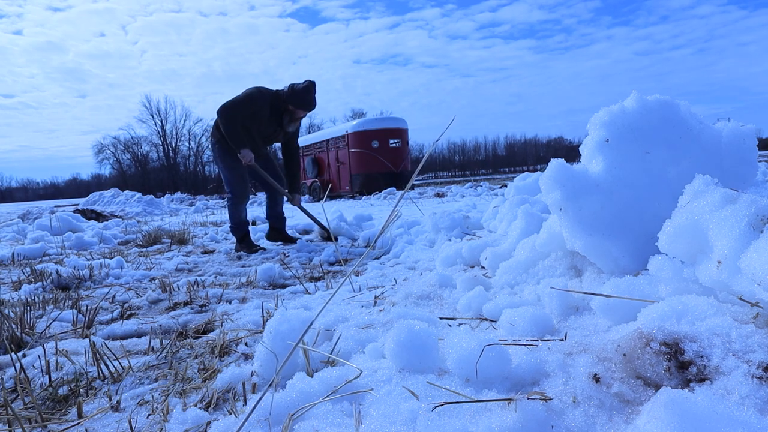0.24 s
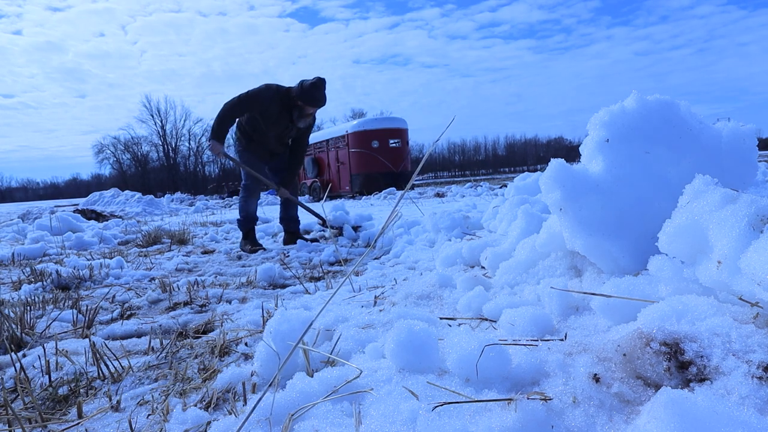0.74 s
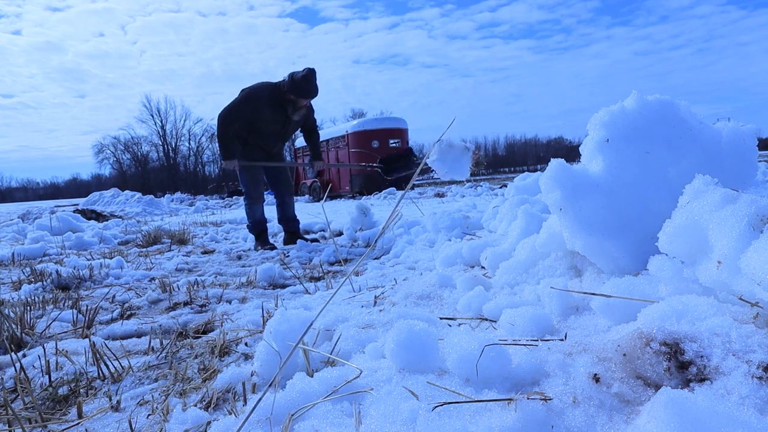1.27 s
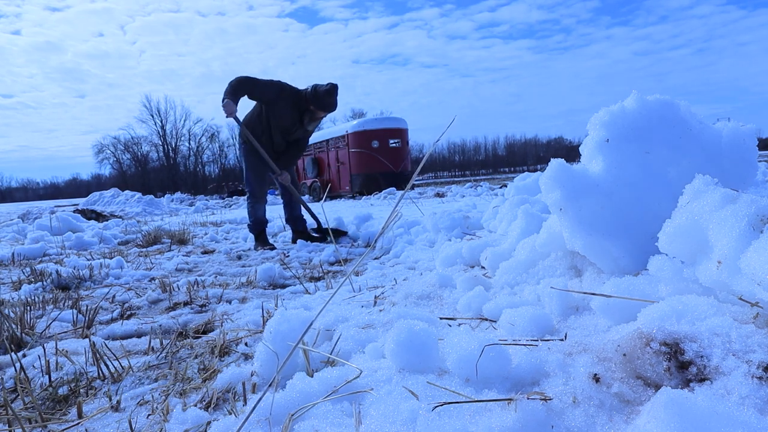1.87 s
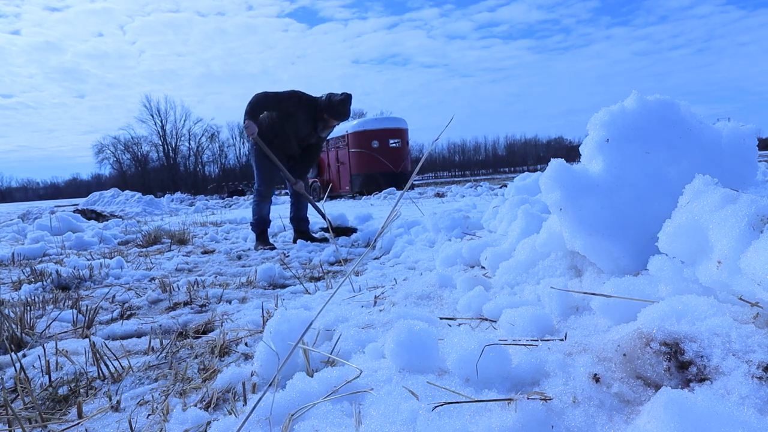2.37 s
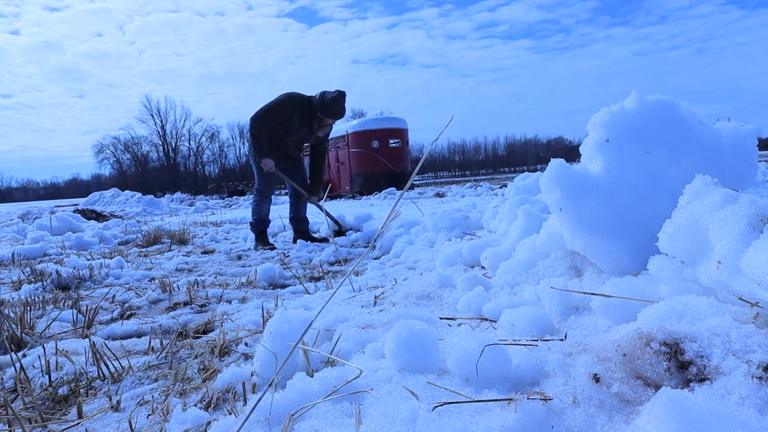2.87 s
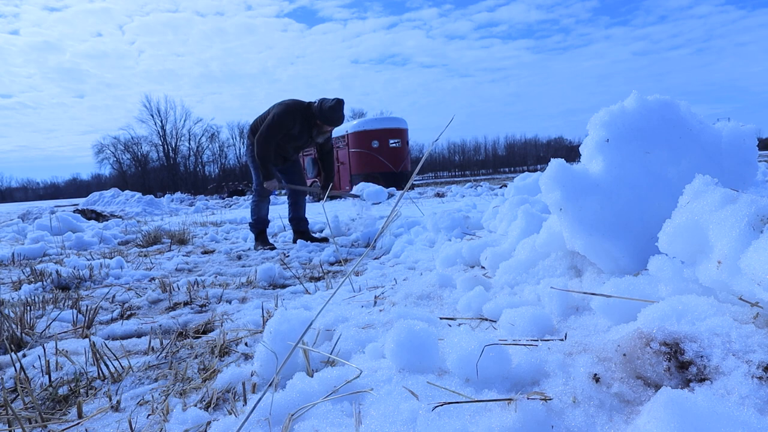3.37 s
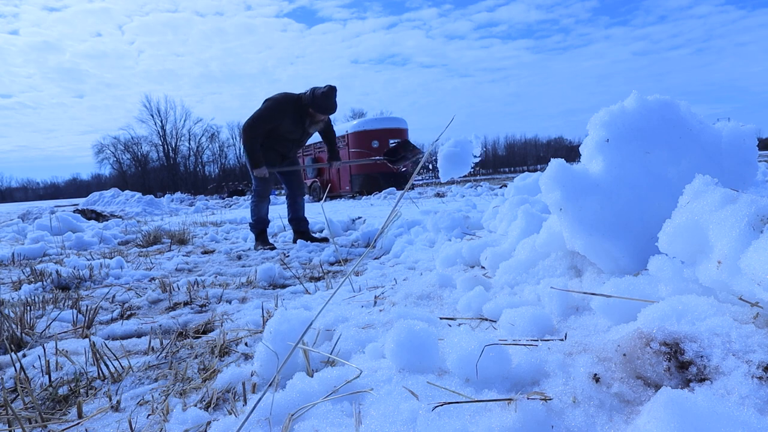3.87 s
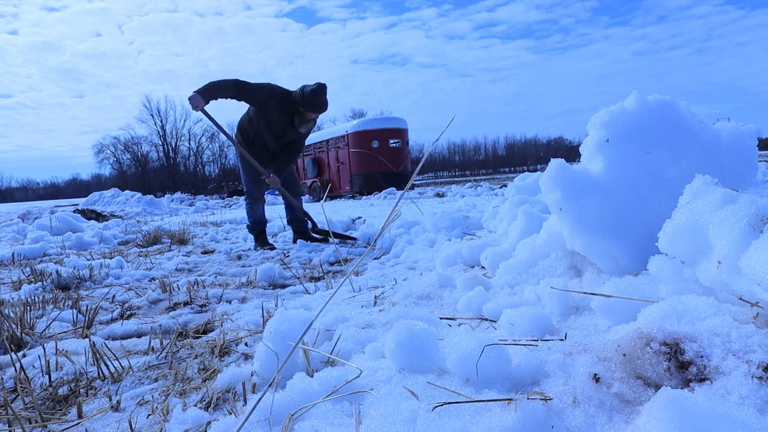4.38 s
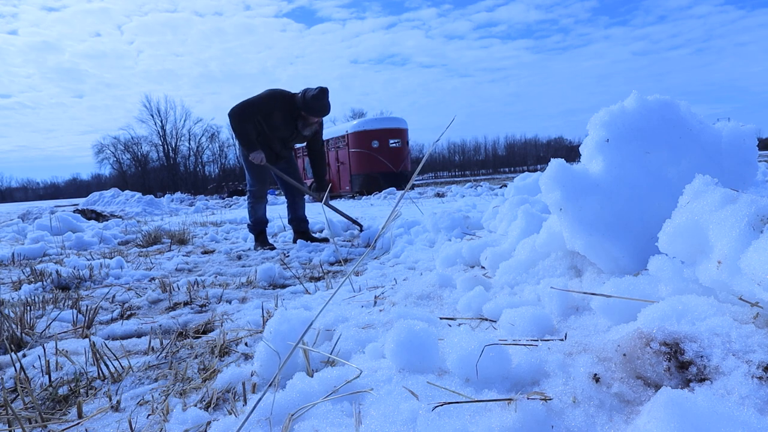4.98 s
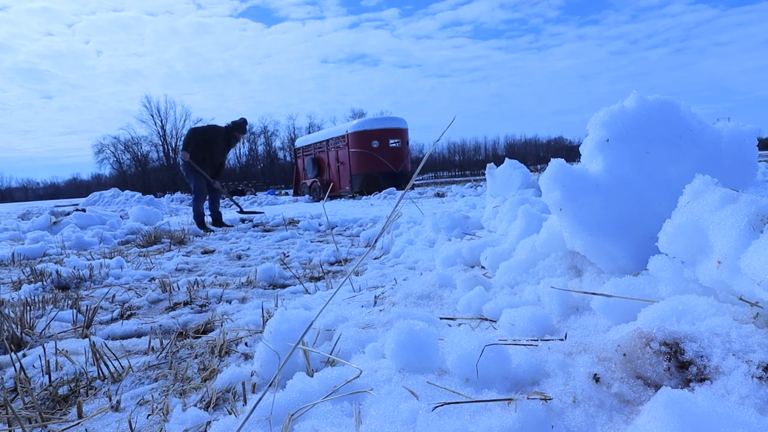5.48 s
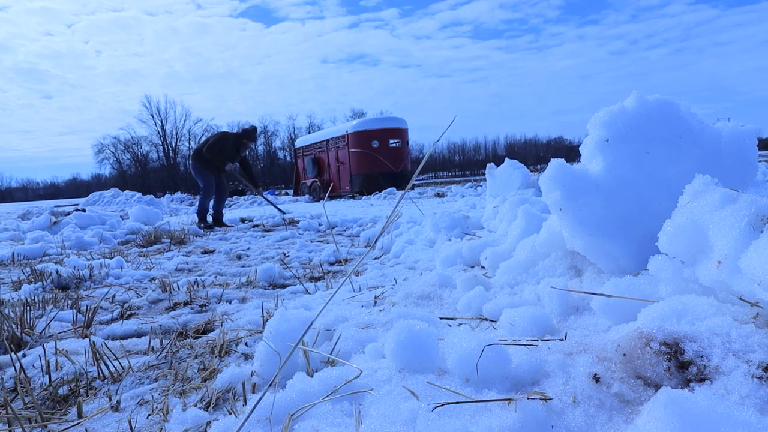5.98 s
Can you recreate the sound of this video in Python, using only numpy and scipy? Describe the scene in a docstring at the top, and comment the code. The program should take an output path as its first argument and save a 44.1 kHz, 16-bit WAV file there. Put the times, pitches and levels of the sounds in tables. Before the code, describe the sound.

Someone digs crusted snow with a long-handled metal shovel, fairly close to an outdoor microphone. A grating first push and a toss lead to sharp double chops, more crunching thrusts, another toss with falling clods, then ice-striking scrapes and a quieter final series. Low wind flutters throughout and a faint thin tone wavers late. Right-sided sound, faint hiss at left, no reverberation.

```python
"""A long-handled shovel digs in crusted snow: dense grains of breaking crust over a low crunch of packing.
The blade's modes ring short while buried and freely as a load slides off; its edge cracks ice and rasps.
Clods puff as filtered grains, wind rumbles and flutters as shaped noise, and a faint thin tone wavers.
All this sits on the right; the left is hiss with a trace of the right, 50 dB down."""
import sys
import numpy as np
from scipy import signal
from scipy.fft import rfft, irfft
from scipy.io import wavfile
from scipy.ndimage import uniform_filter1d

SR = 44100
rng = np.random.default_rng(int(sys.argv[2]) if len(sys.argv) > 2 else 0)


def pcm_store(signal):
    """Save signal as 16-bit PCM."""
    levels = np.round(np.clip(np.atleast_2d(signal), -1, 1) * 32767)
    wavfile.write(sys.argv[1], SR, levels.astype(np.int16).T)


N = 274875
TIME = np.arange(N) / SR

# All table levels are mix settings, ahead of layer trims, random swings and the output gain.
# Background spectra: [f/Hz, level/dB]; each is scaled to rms 1 before its layer level
HISS_SPECTRUM = [(30, -1), (100, -4), (300, -6), (1000, -9.5), (3000, -13), (8000, -15.5), (15500, -17.5)]  # idle left input
AIR_SPECTRUM = [(20, 1.5), (60, 2.5), (100, -10), (180, -15.5), (450, -24), (1100, -28.5), (2600, -34),
                (4200, -33), (9000, -37.5), (15500, -36.5)]  # steady air of the field
RUMBLE_SPECTRUM = [(12, -1.5), (27, 3), (48, -1.5), (75, -3), (110, -12), (200, -68)]  # large eddies
EDDY_SPECTRUM = [(45, -29), (90, 3), (135, -1), (200, -13), (320, -20), (700, -45)]  # small eddies
HISS_DB, AIR_DB = -56, -42.5
# Wind at the microphone: [t/s, rumble level/dB, small-eddy level/dB]
GUSTS = [(0.0, -41, -62), (0.05, -43, -57), (0.42, -33, -40), (0.47, -48, -46), (0.61, -31, -42.5),
         (0.8, -35, -40), (0.87, -40, -48.5), (1.02, -27.5, -40), (1.13, -38.5, -51), (1.68, -43, -48.5),
         (1.82, -33.5, -45), (2.34, -41.5, -43.5), (2.38, -33.5, -38), (2.48, -36, -38), (2.71, -42.5, -47),
         (2.85, -38, -38.5), (2.93, -40, -59), (3.42, -48, -54), (3.99, -35.5, -40), (4.84, -39.5, -47.5),
         (5.03, -54, -61), (5.14, -38.5, -55), (5.21, -58, -53.5), (5.24, -35.5, -38), (5.4, -42.5, -46),
         (5.5, -32.5, -38), (5.53, -43.5, -53), (5.99, -40, -49), (6.11, -43, -62), (6.23, -35, -41.5)]
BUFFET_PER_S, BUFFET_DB = 14, 2.5  # rate and rms depth of the quick swings of the rumble
# Faint thin tone far off: [t/s, f/Hz, level/dB]
FAR_TONE = [(4.95, 1044, -85), (5.02, 1075, -66), (5.1, 1110, -65), (5.12, 1232, -59), (5.25, 1230, -72),
            (5.36, 1240, -57), (5.43, 1230, -77)]
# Lumps of snow break, land or give way under a boot: [t/s, level/dB, nominal band f/Hz, t60/s]
CLODS = [(0.195, -45, 714, 0.07), (0.519, -38.5, 494, 0.054), (0.984, -39, 8000, 0.04),
         (2.042, -30, 710, 0.13), (2.527, -36, 6040, 0.033), (2.658, -27.5, 660, 0.097),
         (3.007, -41.5, 563, 0.047), (3.076, -42.5, 804, 0.13), (3.242, -40, 3000, 0.049),
         (3.61, -40, 7050, 0.071), (3.75, -30.5, 1880, 0.06), (3.821, -34, 1690, 0.062),
         (3.881, -40.5, 3000, 0.1), (3.94, -36.5, 6300, 0.11), (4.055, -35, 8300, 0.018),
         (4.09, -45, 10000, 0.11), (4.139, -30, 770, 0.13), (4.529, -34, 895, 0.058),
         (4.583, -31.5, 130, 0.09), (4.738, -27.5, 885, 0.083), (5.351, -44, 560, 0.069),
         (5.434, -37.5, 573, 0.092)]
# The blade chatters over frozen ground: [start t/s, end t/s, f/Hz, width/Hz, level/dB]
RASPS = [(0.108, 0.296, 750, 160, -38), (0.067, 0.255, 1520, 300, -34.5), (1.788, 1.975, 2180, 380, -37.5),
         (1.95, 2.1, 1485, 200, -35.5), (2.19, 2.225, 1490, 220, -42), (2.57, 2.705, 1300, 150, -37.5),
         (2.584, 2.752, 714, 90, -45), (3.72, 3.84, 826, 160, -47.5), (3.73, 3.848, 2017, 400, -41),
         (4.593, 4.908, 1575, 200, -42), (4.717, 4.86, 490, 90, -49), (4.69, 4.908, 1060, 60, -54),
         (4.795, 4.875, 3300, 200, -38), (5.723, 5.8, 511, 60, -53), (5.875, 5.968, 2700, 550, -35)]
# The edge strikes ice: [t/s, crack level/dB, crack t60/s, ping f/Hz, ping level re crack/dB]
CHOPS = [(1.792, -28, 0.14, 5826, -7.5), (1.955, -23.5, 0.045, 3870, -9), (1.975, -19.5, 0.022, 6450, -0.5),
         (2.572, -19, 0.15, 3700, -7.5), (2.596, -19.5, 0.034, 4360, -22), (3.285, -29, 0.05, 2490, -4.5),
         (4.489, -21, 0.019, 7330, -10.5), (4.806, -29.5, 0.11, 3336, 4.5), (5.686, -35, 0.06, 5010, -3),
         (5.814, -26, 0.051, 8690, -7.5), (5.896, -30.5, 0.053, 3020, 0.5)]
# Modes of the blade: [f/Hz, level/dB before decay weighting, free t60/s]
BLADE_MODES = [(728, -4, .3), (800, -5, .3), (865, -6, .28), (1044, -1, .55), (1250, -11, .25),
               (1410, -5, .25), (1446, -3, .45), (1572, 0, .4), (1645, -5, .25), (1893, -3, .4),
               (2028, -2, .3), (2191, -8, .2), (2395, -8, .17), (2640, -11, .15), (3310, -7, .15),
               (3750, -5, .17), (3925, -4, .15), (4445, -4, .15), (4915, -5, .2), (5800, -8, .12),
               (6395, -3, .15), (7675, -5, .1), (8390, -7, .08), (9225, -6, .08)]
# Colour of each snow layer: [f/Hz, level/dB]
CRUST_SPECTRUM = [(500, -15.5), (1300, -10.5), (2600, -5), (4200, 2.5), (6000, -1.5), (9200, -4.5),
                  (10400, -20), (16000, -24)]
PACKING_SPECTRUM = [(120, -14), (250, -6.5), (480, -1), (750, -0.5), (1050, -1), (1350, -5.5), (2000, -25),
                    (3000, -42)]
RUBBING_SPECTRUM = [(600, -43), (1000, -8), (1250, -5), (1530, -2.5), (2200, -1.5), (3000, -7), (6000, -15)]
POWDER_SPECTRUM = [(4000, -10.5), (8000, 1), (9500, 1.5), (11000, -3), (13000, -4), (16000, -9)]
SLIDING_SPECTRUM = [(400, -30), (720, -7.5), (1050, -2), (2100, -2), (3000, 1.5), (4500, -4), (8000, -22)]
# The blade is pushed into the snow: [start t/s, turning point t/s, end t/s, crust level there/dB,
# drop towards the start/dB, drop towards the end/dB (negative = louder),
# then re crust: rubbing level/dB, packing level/dB, powder level/dB]; "there" is the turning point
STROKES = [ (0.005, 0.139, 0.31, -29.5, 14.5, 15, -2.5, -9.5, -6),
           (1.793, 1.944, 1.99, -31.5, 5.5, -5.5, -8, -22.5, -9),
           (1.97, 1.972, 2.133, -27, 1, 11, -5, -7, -5),
           (2.568, 2.59, 2.76, -29.5, 11, 7.5, -6.5, -9.5, -4),
           (3.236, 3.302, 3.413, -33, 6.5, 4.5, -9, -13.5, -9),
           (3.366, 3.373, 3.775, -36, 3, 54, -1.5, -15, -14),
           (4.118, 4.145, 4.25, -38.5, 20, 14.5, -3.5, -8.5, -7.5),
           (4.457, 4.535, 4.575, -35.5, 2.5, 10, -8, -7.5, -6),
           (4.562, 4.764, 4.785, -32, 10.5, 1, -6, -10, -5),
           (4.789, 4.818, 4.943, -28, 3, 15, -3.5, -10.5, -10.5),
           (5.689, 5.698, 5.8, -42, 0, 1.5, -6, -19, -10), (5.802, 5.822, 5.885, -34, 5, 5, -4, -6.5, -4),
           (5.878, 5.9, 5.975, -33.5, 5, 9, 0.5, -3, -3), (5.975, 6.023, 6.095, -40, -1, 12, 3, 0.5, -10.5),
           ]
# The blade swings up and its load slides off: [columns as for the strokes, then free-ring level/dB]
THROWS = [ (1.199, 1.258, 1.322, -37.5, 5.3, 4, 0.55, -9, -8, -3),
          (3.741, 3.778, 3.85, -44, 5, 11.5, 9.3, -4, -14, -9.5), ]
# Boots shift and loose snow is nudged between strokes: [start t/s, end t/s, crust level/dB,
# then re crust: rubbing level/dB, packing level/dB, powder level/dB]
SHUFFLES = [ (0.307, 0.463, -56.5, -25, -3.5, 4.5), (0.467, 0.54, -53, -4, 6.5, -1),
            (0.566, 0.67, -62, -14, 3, 0), (0.648, 0.957, -49.5, -4.5, -5, -9),
            (0.944, 1.08, -46.5, -2.5, 4, -4), (1.03, 1.166, -42, -18, -19, -7.5),
            (1.159, 1.215, -40.5, -12, -10, -3.5), (1.404, 1.44, -54.5, 2, 7, 0),
            (1.442, 1.524, -55, 4, 7.5, -14), (1.464, 1.546, -49.5, 1, -3, -1),
            (1.55, 1.707, -45, -2.5, -9, -6), (2.148, 2.22, -45.5, -2.5, 3.5, -6.5),
            (2.31, 2.439, -46, -5.5, -10, -8.5), (2.526, 2.604, -39.5, -7.5, -31, -9),
            (2.723, 2.817, -41.5, -26, -32, -4.5), (2.827, 2.937, -47.5, -4.5, -5, -7),
            (2.94, 3.019, -45.5, -10, -9, -2.5), (3.06, 3.16, -44, -4, -10, -8),
            (3.132, 3.229, -39.5, -8.5, -15, -10), (3.543, 3.745, -50, -16, -26, -3.5),
            (3.877, 4.09, -53, -11, -8, -4.5), (3.934, 3.974, -44.5, -9, -7.5, -2.5),
            (4.08, 4.127, -43, -6, -23, 0), (4.193, 4.275, -54, -11, -10, -6),
            (4.33, 4.455, -56.5, 0, -23, -24), (4.993, 5.17, -75, -6, -10, -1.5),
            (5.2, 5.299, -44, 2, -2.5, -16), (5.339, 5.371, -45, -3, -1, -15),
            (5.428, 5.487, -42, -2, -0.5, -10.5), (5.49, 5.526, -46.5, -2, -1, -9),
            (6.126, 6.167, -62.5, 7, 3, -4), (6.203, 6.245, -53.5, -13, 3, 0), ]
# Disturbed snow keeps settling: [crust level/dB, rubbing level/dB, packing level/dB, powder level/dB]
SETTLING = (-67, -72, -75, -66.5)
STROKE_ATTACK_S, SHUFFLE_ATTACK_S = 0.0022, 0.0086  # a blade bites, a boot eases in (time constants)
RELEASE_S = 0.012  # time constant of the crumbling afterwards
STROKE_ARCH = 1.57  # exponent: 1 = effort turns in a point, 2 = rounded
LOAD_DB = 5.5  # packing gains this much re crust over a movement as snow piles up
POWDER_LOSS_DB = 1  # loose powder thins by this much re crust over a movement
SHUFFLE_EDGE_DB = 4  # a shuffle's effort starts and ends this far under its middle
THROW_TAIL_S = 0.07  # the blade stays aloft this long after the push ends
TOP_HZ = 15850


def undb(db):
    """Decibels to amplitude."""
    return 10 ** (np.asarray(db) / 20)


def unit(x):
    """Scale to rms 1."""
    return x / np.sqrt(np.mean(x ** 2))


def curves(rows):
    """Each column after the time column as a value per sample."""
    s, *columns = np.transpose(rows)
    return [np.interp(TIME, s, column) for column in columns]


def colour(x, points):
    """Shape x to a spectrum of (Hz, dB) points that falls away beyond its ends; rms 1."""
    hz, db = np.transpose(points)
    f = np.maximum(np.arange(N // 2 + 1) * SR / N, 1)
    ends = np.minimum(f / hz[0], 1) ** 2 * np.minimum(hz[-1] / f, 1) ** 2
    gain = undb(np.interp(np.log(f), np.log(hz), db)) * ends
    return unit(irfft(rfft(x) * gain, N))


def resonance(x, hz, width):
    """One resonance with steep skirts; rms 1."""
    edges = [max(hz - width / 2, 20), hz + width / 2]
    band = signal.butter(2, edges, "bandpass", fs=SR, output="sos")
    return unit(signal.sosfilt(band, x))


def walk(rate):
    """A random line through rate knots a second; rms 1."""
    knots = rng.standard_normal(8192)
    return unit(np.interp(TIME * rate, np.arange(len(knots)), knots))


def grains(rate, scatter_db):
    """Tiny fractures at random moments, of scattered size and either sign; rms 1."""
    happens = rng.random(N) < rate / SR
    size = undb(scatter_db * np.minimum(rng.exponential(size=N), 5))
    return unit(happens * size * rng.choice([-1, 1], N))


def decay(age, t60):
    """Exponential fall of 60 dB in t60 seconds."""
    return np.exp(-np.log(1000) * age / t60)


def burst(start, t60, rise):
    """A quick swell that dies away."""
    age = np.maximum(TIME - start, 0)
    return (1 - np.exp(-age / rise)) * decay(age, t60)


def hiss():
    """Shaped noise of the idle left input."""
    return undb(HISS_DB) * colour(rng.standard_normal(N), HISS_SPECTRUM)


def air():
    """Steady air of the open field, as shaped noise."""
    return undb(AIR_DB) * colour(rng.standard_normal(N), AIR_SPECTRUM)


def wind():
    """Large eddies rumble on the microphone and small ones flutter above them."""
    rumble_db, eddy_db = curves(GUSTS)
    rumble = colour(rng.standard_normal(N), RUMBLE_SPECTRUM)
    rumble *= undb(rumble_db + BUFFET_DB * walk(BUFFET_PER_S))
    eddies = colour(rng.standard_normal(N), EDDY_SPECTRUM)
    eddies *= undb(eddy_db + 3.8 * walk(25) - 1.0)
    return rumble + eddies


def far_tone():
    """A thin wavering sine rises a little, steps up, then holds, swelling and fading more than once."""
    hz, db = curves(FAR_TONE)
    phase = 2 * np.pi * np.cumsum(hz * (1 + 0.0057 * walk(60))) / SR
    return np.sqrt(2) * undb(db + 3.2 * walk(25)) * np.sin(phase)


def clods():
    """Each lump crumbles in a short puff of grains, filtered to its own band."""
    out = np.zeros(N)
    for s, db, hz, t60 in CLODS:
        edges = [hz / 1.74, min(hz * 1.27, SR / 2 - 1000)]
        band = signal.butter(1, edges, "bandpass", fs=SR, output="sos")
        crumbs = unit(signal.sosfilt(band, grains(rate=4000, scatter_db=0.5)))
        out += undb(db) * burst(s, t60, rise=0.0006) * crumbs
    return out


def rasps():
    """Uneven catches of the edge keep a resonance going for part of a stroke."""
    catches = grains(rate=900, scatter_db=1.5)
    out = np.zeros(N)
    for start, end, hz, width, db in RASPS:
        along = np.clip((TIME - start) / (end - start), 0, 1)
        arch = np.sqrt(4 * along * (1 - along))
        out += undb(db) * arch * resonance(catches, hz, width)
    return out


def blade(force, damping, thicket_db):
    """The blade's modes driven by a force; damping divides the ring times of the modes."""
    age = TIME[:SR // 2]
    ring = np.zeros(len(age))
    for hz, db, free_t60 in BLADE_MODES:
        t60 = free_t60 / damping
        ring += undb(db) / np.sqrt(t60) * decay(age, t60) * np.sin(2 * np.pi * hz * age)
    # between the strong modes lies a thicket of short ones, drawn as decaying noise
    thicket = rng.standard_normal(len(age)) * decay(age, 0.15)
    ring = unit(ring) + undb(thicket_db) * unit(thicket)
    return signal.fftconvolve(force, ring / np.linalg.norm(ring))[:N]


def chops():
    """The edge cracks ice: a bright shower of fractures, a blade ring, and a ping from the part that hit."""
    cracks, pings = np.zeros(N), np.zeros(N)
    shower = colour(grains(rate=6500, scatter_db=0.5), CRUST_SPECTRUM)
    for s, db, t60, hz, ping_db in CHOPS:
        cracks += undb(db) * burst(s, t60, rise=0.00057) * shower
        ping = burst(s, 0.11, rise=0.00049) * resonance(shower, hz, width=63)
        pings += undb(db + ping_db) * ping
    ring = blade(cracks, damping=1.3, thicket_db=14.5)
    return undb(-4.5) * cracks + undb(-1.5) * ring + pings


def chips(count, low_hz, high_hz, cycles):
    """Coarse ice crystals snap off, each ringing briefly at its own pitch; rms 1."""
    when, pitch, size = rng.random((count, 3)).T[:, :, None]
    hz = low_hz * (high_hz / low_hz) ** pitch
    age = TIME[:SR // 40]
    strength = (0.36 + size ** 3) * np.sqrt(hz)
    snaps = strength * np.exp(-age * hz / cycles) * np.sin(2 * np.pi * hz * age)
    places = (when * N).astype(int) + np.arange(len(age))
    return unit(np.bincount(places.ravel(), snaps.ravel(), N)[:N])


def push(start, turn, end, db, start_drop_db, end_drop_db, rub_db, pack_db, powder_db,
         attack=STROKE_ATTACK_S):
    """Power of crust, rubbing, packing and powder as one movement bites, changes effort and crumbles away."""
    bite = 1 - np.exp(-np.maximum(TIME - start, 0) / attack)
    contact = bite * np.exp(-np.maximum(TIME - end, 0) / RELEASE_S)
    on = contact > 1e-3
    t = TIME[on]
    before = np.interp(t, [start, turn], [1, 0])
    after = np.interp(t, [turn, end], [0, 1])
    crust_db = db - start_drop_db * before ** STROKE_ARCH - end_drop_db * after ** STROKE_ARCH
    load = np.interp(t, [start, end], [-.5, .5])
    layers_db = [
        crust_db,
        crust_db + rub_db,
        crust_db + pack_db + LOAD_DB * load,
        crust_db + powder_db - POWDER_LOSS_DB * load,
    ]
    power = np.zeros((4, N))
    power[:, on] = (contact[on] * undb(layers_db)) ** 2
    return power


def work():
    """Sum the power of all movements and settling: dB of crust, rubbing, packing and powder."""
    power = sum(push(*row) for row in STROKES)
    power += sum(push(*row[:-1]) for row in THROWS)
    power += undb(SETTLING)[:, None] ** 2
    for start, end, db, *shares_db in SHUFFLES:
        middle = (start + end) / 2
        power += push(start, middle, end, db, SHUFFLE_EDGE_DB, SHUFFLE_EDGE_DB, *shares_db,
                      attack=SHUFFLE_ATTACK_S)
    return 10 * np.log10(power)


def throw_gates():
    """Smoothed share of the blade that is aloft, and the free-ring gain of each throw."""
    lifted, ring_gain = np.zeros(N), np.zeros(N)
    for start, _, end, *_, ring_db in THROWS:
        during = (TIME > start) & (TIME < end + THROW_TAIL_S)
        lifted += during
        ring_gain += undb(ring_db) * during
    return uniform_filter1d(lifted, SR // 50), ring_gain


def digging():
    """The blade advances in little slips; each breaks crust, packs the snow below and rubs the metal."""
    crust_db, rub_db, pack_db, powder_db = work()
    slips_db = 1.35 * walk(85)
    crust_gain = undb(crust_db + slips_db)
    crust = colour(grains(rate=7000, scatter_db=1.0), CRUST_SPECTRUM) * crust_gain
    coarse = chips(count=3000, low_hz=1500, high_hz=9300, cycles=9) * crust_gain * undb(-6)
    powder = colour(grains(rate=6000, scatter_db=-6.5), POWDER_SPECTRUM)
    powder *= undb(powder_db + slips_db + 3.0)
    packing = colour(grains(rate=1600, scatter_db=2.0), PACKING_SPECTRUM)
    packing *= undb(pack_db + slips_db + 1.18 * walk(50) - 0.94)
    friction = undb(rub_db + slips_db + 1.14 * walk(60) - 1.5)
    rubbing = colour(grains(rate=2500, scatter_db=2.0), RUBBING_SPECTRUM) * friction

    aloft, ring_gain = throw_gates()
    # a firm bite drives the metal fully; light shuffling drives it less
    bite = np.interp(crust_db, [-46, -35], [.3, 1])
    force = rubbing + undb(-6.0) * packing + undb(-1.5) * crust
    buried = undb(-8.5) * blade(force * bite * (1 - aloft), damping=1.52, thicket_db=4.5)
    # in the air the load slides off a blade that is free to ring
    sliding = colour(grains(rate=2500, scatter_db=2.0), SLIDING_SPECTRUM) * friction * aloft
    free = blade(sliding * ring_gain, damping=1, thicket_db=-7)
    snow = undb(-2.0) * crust + coarse + powder + packing
    return snow + rubbing * undb(1.0 - 4.7 * aloft) + buried + free


def scene():
    """Open snow gives no echo: the dry layers feed the right, hiss and a trace of the right feed the left."""
    layers = digging() + chops() + rasps() + clods() + wind() + air() + far_tone()
    right = undb(5.5) * layers
    left = hiss() + undb(-50) * right
    return np.array([left, right])


def record(dry):
    """The recorder cuts the top with a steep low-pass."""
    low_pass = signal.ellip(10, .2, 80, TOP_HZ, fs=SR, output="sos")
    return signal.sosfilt(low_pass, dry)


dry = scene()
out = record(dry)
pcm_store(out)
```